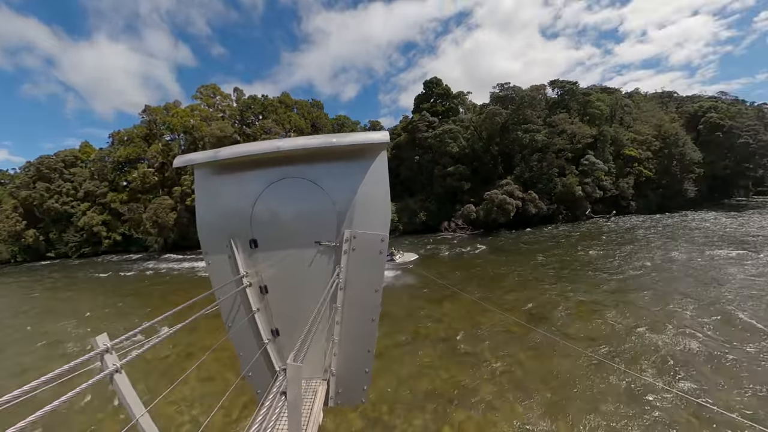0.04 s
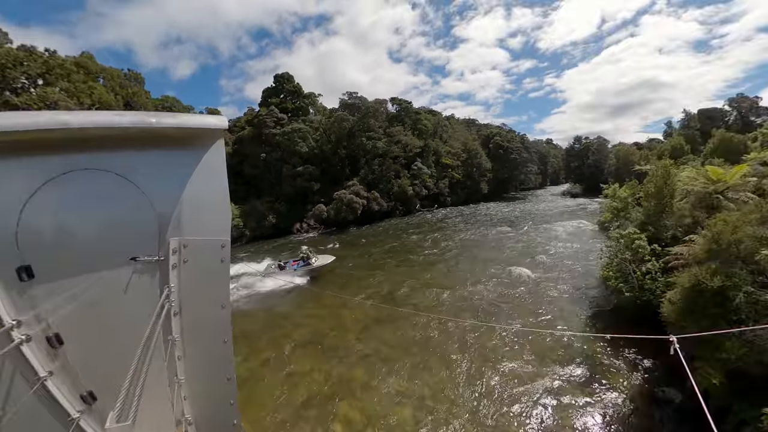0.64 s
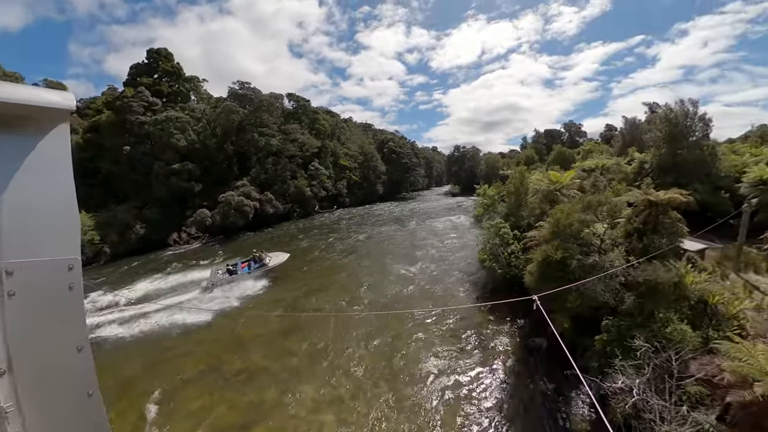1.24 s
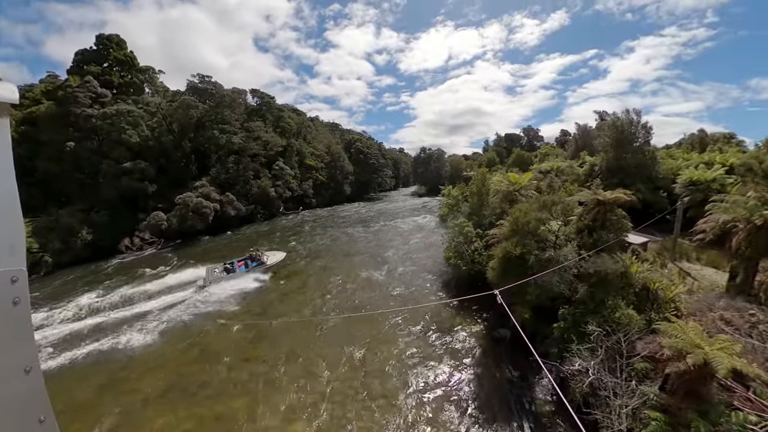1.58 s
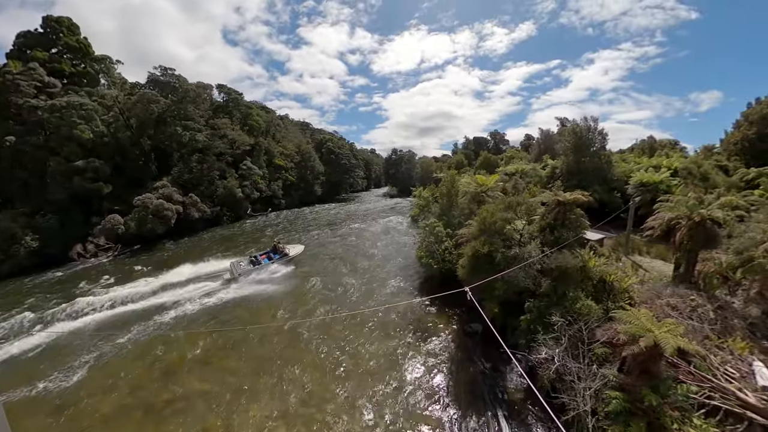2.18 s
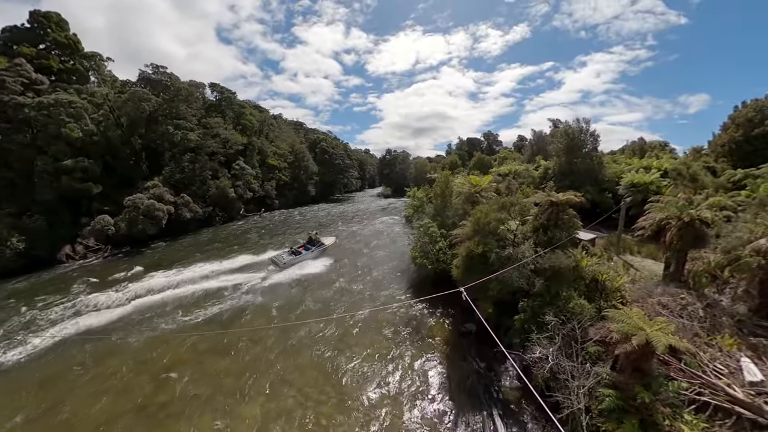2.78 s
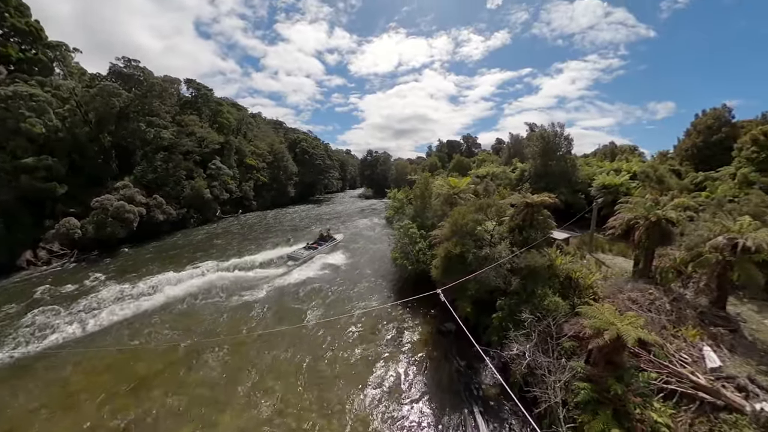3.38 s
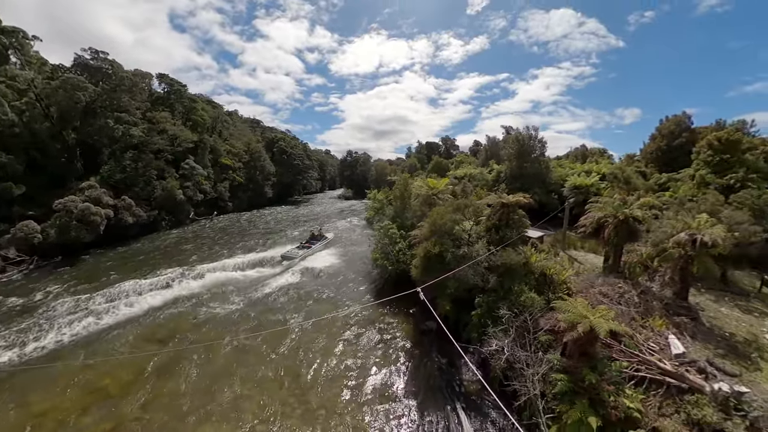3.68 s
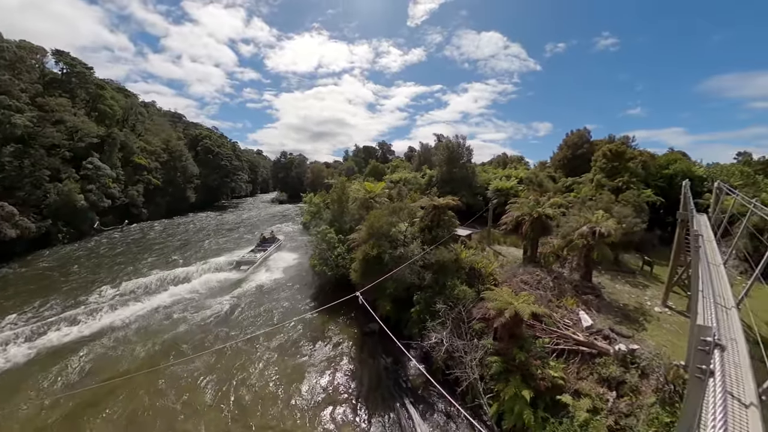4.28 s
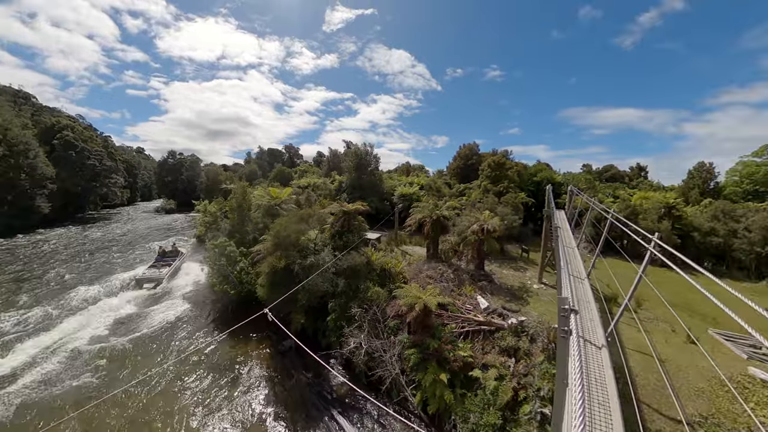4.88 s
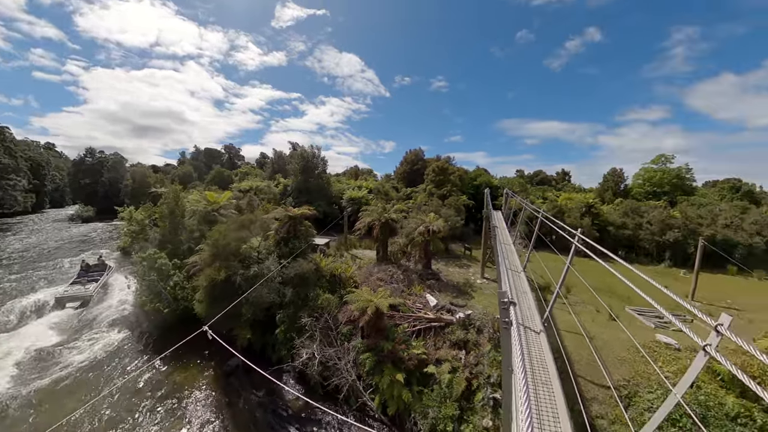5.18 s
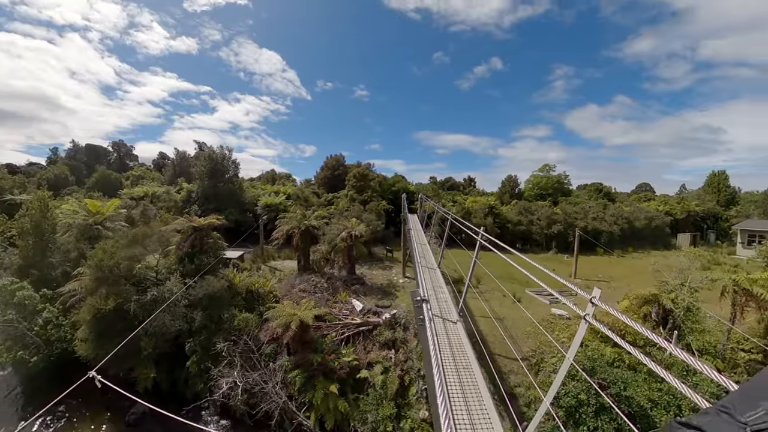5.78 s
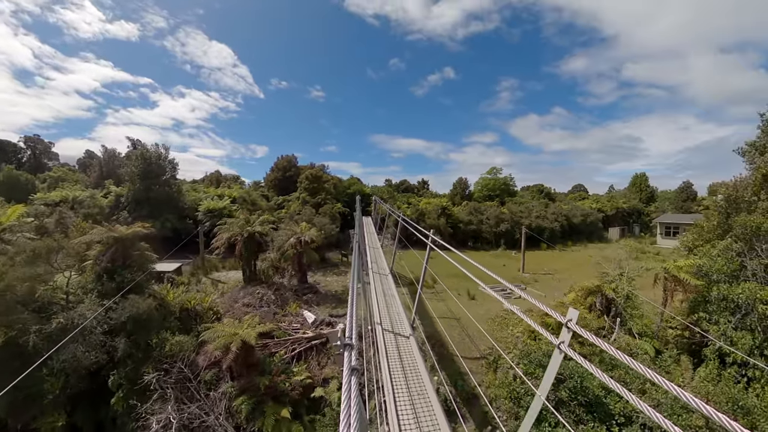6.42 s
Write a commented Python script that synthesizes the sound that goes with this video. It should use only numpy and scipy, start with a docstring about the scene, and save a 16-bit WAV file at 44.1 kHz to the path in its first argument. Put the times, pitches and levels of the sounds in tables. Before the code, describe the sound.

A speeding boat passes, its low engine note dropping and then holding steady amid churning water and splashes.

```python
"""A V8 jet boat runs up a river below a footbridge, over rushing rapids and light wind on the microphone.
Its exhaust pipe favours the engine orders near resonance: a throbbing drone that falls in the first 1.3 s.
At 0.5 s the hiss and patter of the wake clear the bridge tower, and the hull starts slapping waves.
Abeam at 1.5 s, the boat turns its stern to the listener; the note holds and the overtones grow.
Near 4 s the note lifts as the wake slips behind a bush, then sags again after 5.5 s."""
import sys
import numpy as np
from scipy import signal
from scipy.fft import rfft, irfft, next_fast_len
from scipy.io import wavfile
from scipy.ndimage import uniform_filter1d

SR = 44100
rng = np.random.default_rng(int(sys.argv[2]) if len(sys.argv) > 2 else 0)


def dump_mix(stems):
    """Bounce the given channels to the path in sys.argv[1] as a 16-bit WAV at rate SR."""
    frames = np.atleast_2d(stems).T  # one column per channel
    limited = np.clip(frames, -1, 1)  # hard clip at full scale
    pcm = np.round(limited * 32767).astype(np.int16)
    wavfile.write(sys.argv[1], SR, pcm)


N = 284439
T = np.arange(N) / SR
ABEAM_S, ABEAM_M, BOAT_M_PER_S = 1.51, 33.5, 9.8

# firing rate as heard: t/s, f/Hz
FIRING_RATE = [(0.0, 161.6), (0.39, 157.6), (0.69, 123.4), (0.92, 110.3), (1.27, 98.43), (1.57, 107.5),
               (1.81, 105.2), (1.9, 109.2), (2.85, 107.3), (3.09, 105.5), (3.83, 105.7), (4.12, 117.2),
               (4.36, 119.5), (5.37, 114.6), (5.54, 117.1), (6.0, 112.4), (6.25, 106.9), (6.45, 104.5)]


def engine():
    """Four-stroke V8, eight firings a cycle; orders are multiples of the cycle rate."""
    firing_hz = uniform_filter1d(np.interp(T, *np.transpose(FIRING_RATE)), SR // 12)
    cycle_hz = firing_hz / 8
    phase = 2 * np.pi * np.cumsum(cycle_hz) / SR
    _, astern = track()
    tones = drone(phase, cycle_hz, astern) + side_orders(phase, cycle_hz, astern)
    return np.sqrt(2) * tones + rough_firing(phase)


# swells and dips of the drone: t/s, width/s, tone change/dB, throb change/dB
DRONE_SWELLS = [(0.445, 0.083, -3.5, -.5), (1.912, 0.065, -7, 5), (2.227, 0.14, -3.5, 5.5),
                (2.92, 0.14, -3.5, -1), (4.294, 0.28, 1.3, 3), (4.86, 0.12, -2.4, 4), (5.501, 0.28, 0, 4)]


def drone(phase, cycle_hz, astern):
    """Firing tone at order 8, louder astern; uneven firing within each bank throbs at order 5."""
    tone_db = -20.5 + 3 * astern + sum(db * swell(t, width) for t, width, db, _ in DRONE_SWELLS)
    throb_db = -20 + sum(db * swell(t, width) for t, width, _, db in DRONE_SWELLS)
    tone = pipe(8 * cycle_hz) * undb(tone_db + .25 * walk(10)) * np.cos(8 * phase)
    throb = pipe(5 * cycle_hz) * undb(throb_db + .5 * walk(10)) * np.cos(5 * phase)
    return tone + throb


# cycle overtones, abeam, before pipe and muffler: order, level/dB
OVERTONES = [(10, -45.5), (11, -40.5), (12, -58), (13, -42), (14, -59.5), (15, -51)]
# weak orders from unequal cylinders, before the pipe: order, level/dB
WEAK_ORDERS = [(2, -32), (3, -40), (4, -38.5), (6, -46), (7, -44.5), (9, -47)]


def side_orders(phase, cycle_hz, astern, muffler_hz=226, overrun_hz_per_s=150):
    """Overtones and weak orders; both rise while the note falls and the cylinders fire less alike."""
    fall_hz_per_s = np.maximum(-np.gradient(8 * cycle_hz) * SR, 0)
    overrun_db = 11 * (fall_hz_per_s / overrun_hz_per_s) ** 2
    out = np.zeros(N)
    for order, db in OVERTONES:
        hz = order * cycle_hz
        muffler = 1 / np.sqrt(1 + (hz / muffler_hz) ** 16)
        gain = undb(db + 15.5 * astern + overrun_db + 1.2 * walk(4))
        out -= pipe(hz) * muffler * gain * np.cos(order * phase)  # antiphase above resonance
    for order, db in WEAK_ORDERS:
        gain = undb(db + overrun_db + 2.5 * walk(4))
        out += pipe(order * cycle_hz) * gain * np.sin(order * phase)
    return out


def pipe(hz):
    """The exhaust pipe favours whichever order is near its resonance."""
    return np.abs(resonance(hz, 103.6, 36.7))


# spells of uneven firing: t/s, width/s, burble/dB, crank shake/dB
STUMBLES = [(.63, 0.097, -35, -50), (0.778, 0.073, -50, -39), (1.644, 0.055, -36, -44),
            (2.247, .25, -42, -49), (4.964, .018, -45, -51), (5.119, 0.071, -43, -52)]


def rough_firing(phase, steady_db=-39.5):
    """Scatter in firing strength rings the pipe as a burble; stumbles shake once per crank turn."""
    firings = np.diff(np.floor(8 * phase / (2 * np.pi)), prepend=0)
    burble = unit(filtered(firings * rng.standard_normal(N), lambda hz: resonance(hz, 98, 42) ** 2))
    shake = np.sqrt(2) * np.sin(2 * phase)
    return burble * (undb(steady_db) + bursts(STUMBLES)) + shake * bursts(STUMBLES, column=3)


# jet and wake bands: f/Hz, level abeam/dB, tower loss/dB, bush loss/dB
WAKE_BANDS = [(400, -36, 2, 2.5), (1010, -35.5, 13, 2), (4000, -35, 10.5, 1), (10000, -33.8, 3.5, 4)]


def wake():
    """Churn, wash and spray fade with distance, screened first by the tower, later by the bush."""
    distance_m, _ = track()
    behind_tower = 1 - crossing(0.47, width_s=0.1)
    behind_bush = crossing(4.05, width_s=.08)
    levels_db = np.array([db - tower_db * behind_tower - bush_db * behind_bush
                          for _, db, tower_db, bush_db in WAKE_BANDS])
    return ABEAM_M / distance_m * white_water(levels_db, [row[0] for row in WAKE_BANDS])


# white-water spectral density: f/Hz, level/dB
WATER_SPECTRUM = [(140, 6), (230, -0.5), (370, -0.5), (580, -6), (1000, -6.5), (1850, -9.5), (3000, -13),
                  (5000, -17.5), (7400, -22.5), (9700, -29), (11500, -47), (15000, -52)]


def white_water(levels_db, bands_hz):
    """Bursting foam and falling drops, in octave bands that surge together and flicker alone."""
    grains = unit(rng.standard_normal(N) + .6 * drops(per_s=5000, spread_db=3))
    water = unit(filtered(grains, lambda hz: colour(hz, WATER_SPECTRUM)))
    surge_db = 0.56 * walk(4.1)
    out = np.zeros(N)
    for centre_hz in 125 * 2. ** np.arange(8):
        band = filtered(water, lambda hz: np.maximum(1 - np.abs(np.log2(hz / centre_hz)), 0))
        weights = [np.interp(np.log(centre_hz), np.log(bands_hz), row) for row in np.eye(len(bands_hz))]
        flicker_db = 0.9 * (500 / centre_hz) ** .4 * walk(18)  # big bubbles are few: lows flicker most
        out += band * undb(np.dot(weights, levels_db) + surge_db + flicker_db)
    return out


# hull meets wave: t/s, width/s, thump/dB, splash/dB
SLAPS = [(0.399, .011, -34.5, -52), (0.548, 0.0062, -48, -46), (0.637, 0.025, -48, -32.5),
         (0.796, 0.081, -44, -40), (1.07, 0.017, -35, -39), (1.632, 0.034, -36.5, -38.5),
         (2.167, 0.018, -38, -55), (2.36, 0.09, -53, -50), (3.513, 0.08, -50, -42.5),
         (5.117, 0.061, -47, -47)]
# splash spectral density: f/Hz, level/dB
SPLASH_SPECTRUM = [(200, 8.5), (700, 0), (1400, 1.5), (2500, -5.5), (5000, -16), (9000, -28), (12000, -59)]
# flurries of fine spray: t/s, width/s, level/dB
FLURRIES = [(1.353, 0.12, -42), (2.38, 0.11, -46.5), (4.006, 0.089, -49.5), (5.33, 0.013, -46)]


def hull_slaps():
    """The hull thumps into waves and throws sheets of drops; fine spray fizzes in flurries."""
    patter = drops(per_s=9000, spread_db=2.5)
    thump = unit(filtered(rng.standard_normal(N), lambda hz: resonance(hz, 302, 330) ** 2))
    splash = unit(filtered(patter, lambda hz: colour(hz, SPLASH_SPECTRUM)))
    fizz = unit(filtered(patter, lambda hz: resonance(hz, 4450, 8000) * colour(hz, WATER_SPECTRUM)))
    return thump * bursts(SLAPS) + splash * bursts(SLAPS, column=3) + fizz * bursts(FLURRIES)


def river(level_db=-43):
    """Even rush of the rapids."""
    noise = rng.standard_normal(N)
    rush = filtered(noise, lambda hz: resonance(hz, 1000, 3200) * colour(hz, WATER_SPECTRUM))
    return unit(rush) * undb(level_db + 0.53 * walk(0.7))


# gusts: t/s, width/s, level/dB
GUSTS = [(.76, .1, -35), (1.67, .06, -43), (2.3, .2, -58)]
# wind spectral density: f/Hz, level/dB
WIND_SPECTRUM = [(12, -10.5), (28, -1), (60, 3), (130, 5.5), (220, -9), (500, -41.5), (2000, -79)]


def wind(breeze_db=-40, fall_db_per_s=2):
    """A dying breeze and light gusts rumble on the microphone."""
    strength = undb(breeze_db - fall_db_per_s * T) + bursts(GUSTS)
    rumble = unit(filtered(rng.standard_normal(N), lambda hz: colour(hz, WIND_SPECTRUM)))
    return rumble * strength * undb(walk(4.4))


def track():
    """Boat distance/m, and how far its stern faces the bridge (0-1)."""
    along_m = BOAT_M_PER_S * (T - ABEAM_S)
    distance_m = np.hypot(along_m, ABEAM_M)
    return distance_m, np.maximum(along_m / distance_m, 0) ** 0.47


def drops(per_s, spread_db):
    """Drop impacts of scattered size, rms 1."""
    hit = rng.random(N) < per_s / SR
    size = undb(spread_db * np.minimum(rng.exponential(size=N), 3))
    return unit(hit * size * rng.choice([-1, 1], N))


def walk(rate_hz):
    """Smooth random drift, rms 1."""
    steps = np.convolve(rng.standard_normal(2048), np.hanning(9), "same")
    return unit(np.interp(T * rate_hz * 4, np.arange(2048), steps))


def swell(t_s, width_s):
    """Gaussian bell, peak 1."""
    return np.exp(-.5 * ((T - t_s) / width_s) ** 2)


def bursts(table, column=2):
    """Sum of bells from rows of t/s, width/s, with peak/dB in the given column."""
    return sum(undb(row[column]) * swell(*row[:2]) for row in table)


def crossing(t_s, width_s):
    """Smooth step from 0 to 1."""
    return .5 + .5 * np.tanh((T - t_s) / width_s / 2)


def filtered(x, response):
    """Filter by response(hz)."""
    size = next_fast_len(N + SR // 2)
    hz = np.maximum(np.arange(size // 2 + 1) * SR / size, 1)
    return irfft(rfft(x, size) * response(hz), size)[:N]


def colour(hz, spectrum):
    """Gain from rows of f/Hz, level/dB."""
    points_hz, db = np.transpose(spectrum)
    return undb(np.interp(np.log(hz), np.log(points_hz), db))


def resonance(hz, centre_hz, width_hz):
    """One resonance, gain 1 at centre."""
    return 1 / (1 + 1j * (hz ** 2 - centre_hz ** 2) / (hz * width_hz))


def undb(db):
    """Decibels to gain."""
    return 10 ** (np.asarray(db) / 20)


def unit(x):
    """Scale to rms 1."""
    return x / np.sqrt(np.mean(x ** 2))


def scene():
    """Boat, river and wind, heard from the bridge."""
    return (engine() + wake() + hull_slaps() + river() + wind())[None]


# dips and peaks of the microphone housing's cavities: f/Hz, width/Hz, gain
HOUSING = [(957, 99, -0.36), (1026, 120, 0.34), (4700, 320, -.3), (5100, 480, 0.25), (8900, 760, -0.14)]


def record(dry, target_db=-19, agc_share=0.14, agc_s=0.08, top_hz=15600):
    """Housing colour, gain control that steers part way to its target, then a low-pass."""
    heard = filtered(dry[0], lambda hz: 1 + sum(g * resonance(hz, f, width) for f, width, g in HOUSING))
    window = int(agc_s * SR)
    rms = np.sqrt(uniform_filter1d(uniform_filter1d(heard ** 2, window), window))
    heard *= (undb(target_db) / rms) ** agc_share
    lowpass = signal.ellip(8, .2, 70, top_hz, fs=SR, output="sos")
    return signal.sosfilt(lowpass, heard)[None]


dry = scene()
out = record(dry)
dump_mix(out)
```